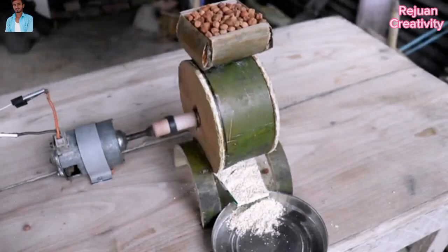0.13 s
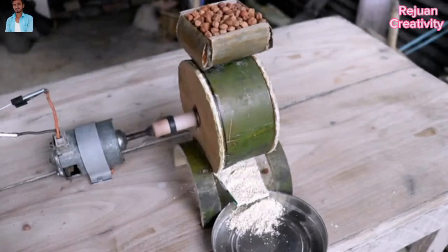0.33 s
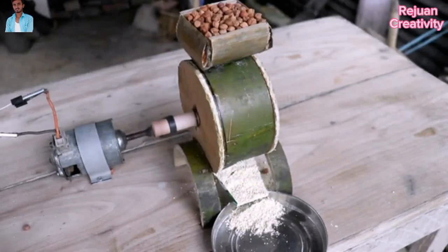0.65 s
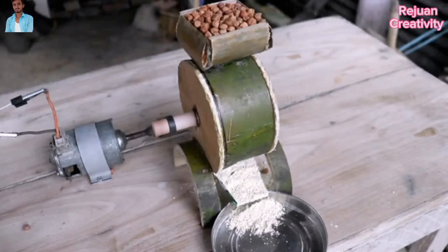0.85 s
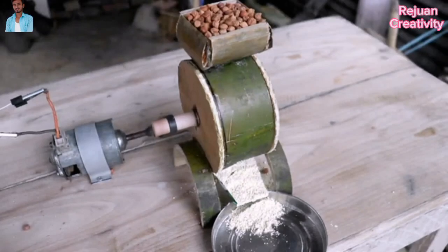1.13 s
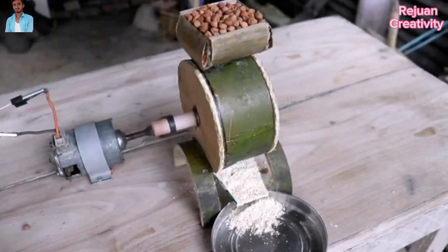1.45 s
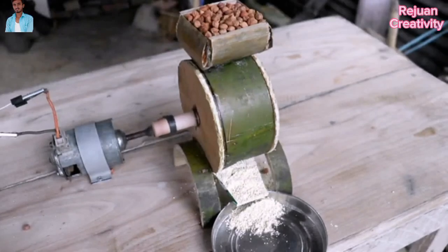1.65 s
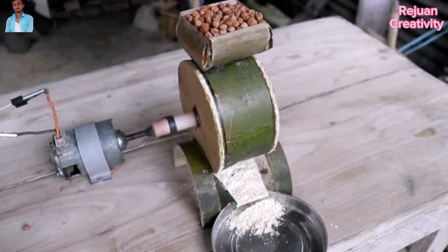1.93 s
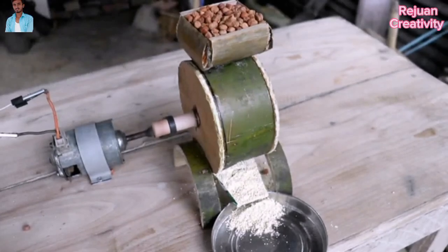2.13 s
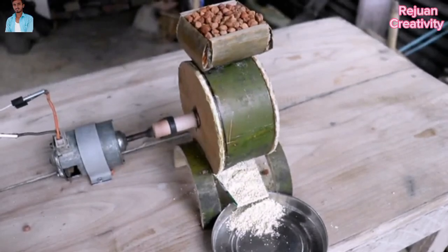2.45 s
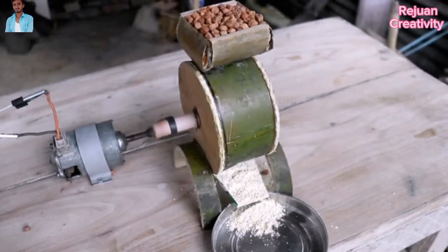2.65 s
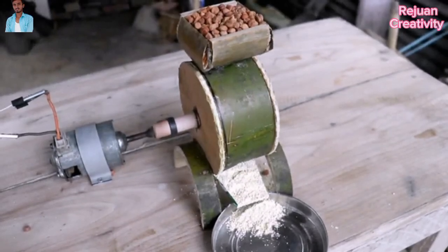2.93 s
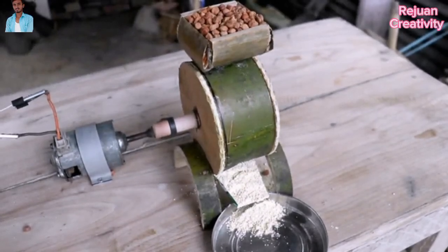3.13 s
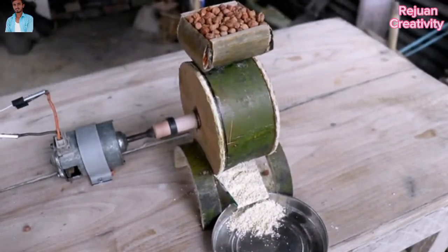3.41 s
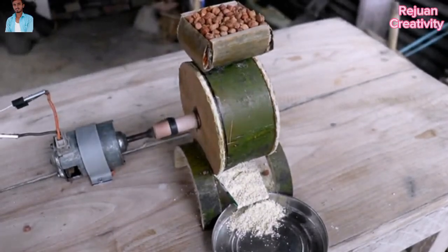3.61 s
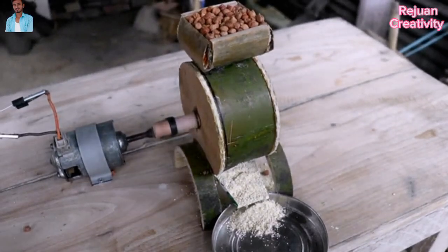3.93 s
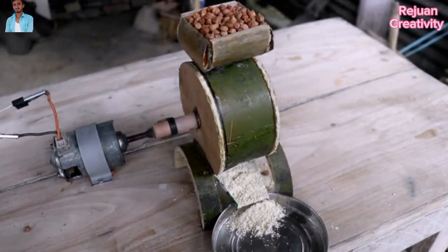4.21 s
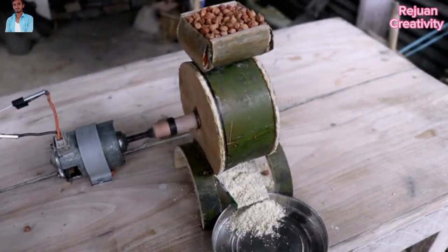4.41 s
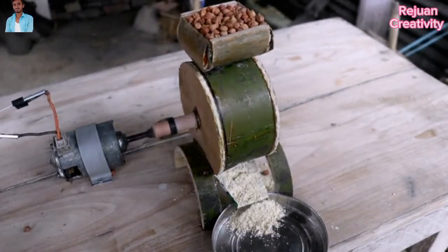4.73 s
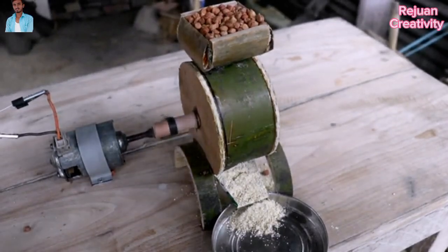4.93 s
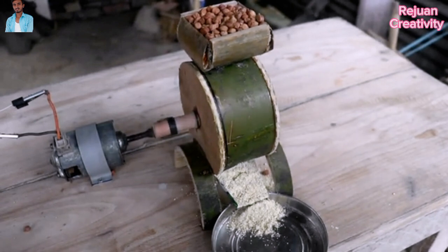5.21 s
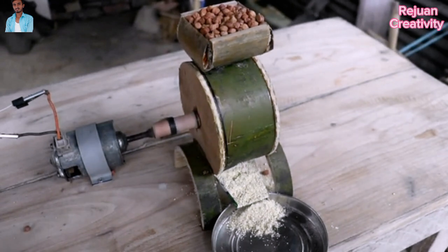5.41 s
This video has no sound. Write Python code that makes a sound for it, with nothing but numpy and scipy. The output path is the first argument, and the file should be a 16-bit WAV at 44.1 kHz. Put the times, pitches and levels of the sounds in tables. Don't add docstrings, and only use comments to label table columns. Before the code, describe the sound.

A small homemade motor-driven mill cracks and rattles hard kernels in a drum, with sharp snaps, hollow knocks, dusty hiss and low shaking.

```python
import sys
import numpy as np
from scipy import signal
from scipy.fft import rfft, irfft, next_fast_len
from scipy.io import wavfile

SR = 44100
rng = np.random.default_rng(int(sys.argv[2]) if len(sys.argv) > 2 else 0)


def invert_db(level):
    return 10 ** (np.asarray(level, dtype=float) / 20)


def output_pcm(signal):
    pcm = np.clip(np.atleast_2d(signal).T, -1, 1) * 32767
    wavfile.write(sys.argv[1], SR, np.round(pcm).astype(np.int16))


N = 245195

# mode_hz, level_db, t60_s
WALL_MODES = [(740, -19, 0.0028), (930, -10, 0.033), (1216, 0, 0.019), (1454, -5, 0.018),
              (1812, -6.5, 0.038), (1948, -1.5, 0.029), (2086, -5.5, 0.036), (2543, -1.5, 0.025),
              (2743, -8, 0.041), (3187, -12.5, 0.054), (3630, -19, 0.0074), (4200, -31, 0.033)]
# freq_hz, density_db_per_hz
SPLINTER_SPECTRUM = [(900, -14.5), (1800, -10), (2700, 7), (4300, -3), (5800, -15.5), (9000, -25)]


def rms_one(x):
    return x / np.sqrt(np.mean(x ** 2, axis=-1, keepdims=True) + 1e-20)


def in_time(rows):
    time_s, *columns = np.transpose(rows)
    return [np.interp(np.arange(N) / SR, time_s, column) for column in columns]


def shape_gain(size, points):
    bin_hz = np.maximum(np.arange(size // 2 + 1) * SR / size, 1)
    freq_hz, level_db = np.array(points).T
    return invert_db(np.interp(np.log(bin_hz), np.log(freq_hz), level_db))


def colour(x, points):
    size = next_fast_len(N)
    return irfft(rfft(x, size) * shape_gain(size, points), size)[..., :N]


def drift(rate_hz):
    r = np.exp(-2 * np.pi * rate_hz / SR)
    settle = 9000
    noise = rng.standard_normal(N + settle)
    return rms_one(signal.lfilter([1], [1, -2 * r, r * r], noise)[settle:])


def ring(clicks, mode_hz, t60_s):
    r = invert_db(-60 / (t60_s * SR))
    w = 2 * np.pi * mode_hz / SR
    return signal.lfilter([0, np.sin(w)], [1, -2 * r * np.cos(w), r * r], clicks + 1e-18)


def resonance(x, mode_hz, width_hz):
    t60_s = np.log(1000) / np.pi / width_hz
    return rms_one(ring(ring(x, mode_hz, t60_s), mode_hz, t60_s / 3))


def grains(per_s, spread_db):
    hits = rng.random(N) < per_s / SR
    sizes = invert_db(spread_db * np.minimum(rng.exponential(1, N), 4)) * hits
    return sizes * rng.choice([-1, 1], (2, N))


def placed(times_s, level_db, bursts):
    out = np.zeros((2, N + SR))
    for time_s, db, burst in zip(times_s, level_db, bursts):
        start = int(time_s * SR)
        peak = np.abs(burst).max(1, keepdims=True)
        out[:, start:start + burst.shape[1]] += invert_db(db) * burst / peak
    return out[:, :N]


def strikes(times_s, level_db, modes, rise_s, detune, scatter_db):
    t = np.arange(2200) / SR
    mode_hz, mode_db, t60_s = np.transpose(modes)[:, None, :, None, None]
    luck = rng.standard_normal((len(times_s), len(modes), 2, 3))
    pitch_hz = mode_hz * np.exp(detune * luck[:, :, :1, :1])
    gain = invert_db(mode_db + scatter_db * luck[..., 1:2] - 60 * t / t60_s)
    rings = gain * np.sin(2 * np.pi * (pitch_hz * t + luck[..., 2:]))
    return placed(times_s, level_db, rings.sum(1) * (1 - np.exp(-t / rise_s)))


def splinters(times_s, level_db, spectrum, length_s):
    stretch = np.exp(0.36 * rng.standard_normal((len(times_s), 1, 1)))
    t = np.arange(600) / SR / length_s[:, None, None] / stretch
    swarm = rng.standard_normal((len(times_s), 2, 600)) * t * np.exp(-t)
    return placed(times_s, level_db, irfft(rfft(swarm, 1024) * shape_gain(1024, spectrum)))


def frame(shake_db):
    modes_hz = [62, 110, 154, 203, 360, 442, 586]
    # width_hz, level_db
    mode_shapes = [(18.2, -11), (50, -6.5), (14.5, -1.5), (20, 2), (45.6, 2.5), (21.7, 0), (43.3, -8.5)]
    blows = grains(300.0 * invert_db(2.2 * drift(30.0)), 2.85)
    shaking = 0
    for mode_hz, (width_hz, level_db) in zip(modes_hz, mode_shapes):
        shaking = shaking + invert_db(level_db) * resonance(blows, mode_hz, width_hz)
    return invert_db(shake_db + 5.5) * rms_one(shaking)


def grit_in_air(times_s, level_db):
    settle_s = 0.05
    thrown = np.zeros(N)
    thrown[(times_s * SR).astype(int)] = invert_db(level_db)
    r = np.exp(-1 / (settle_s * SR))
    grit = signal.lfilter([1], [1, -2 * r, r * r], thrown)
    return grit / grit.mean()


def dust(hiss_db):
    # freq_hz, density_db_per_hz
    hiss_spectrum = [(1470, 12), (2500, -3.5), (3200, -2.5), (4260, -6.5), (6680, -19.5), (7530, -17),
                     (8740, -16.5), (12500, -24.5), (14300, -22), (14900, -18), (15400, -50)]
    grit = np.abs(grains(180.0 * invert_db(5.0 * drift(22.0)), 3.3)[0])
    puffs = 1 + 0.74 * signal.lfilter([1], [1, -.97], grit)
    edges_hz = np.geomspace(2000, 16000, 8)
    white = rng.standard_normal((2, 2, N))
    bands = 0
    for k, edge_hz in enumerate(zip(edges_hz, edges_hz[1:])):
        band = signal.sosfilt(signal.butter(2, edge_hz, "band", fs=SR, output="sos"), white[k % 2])
        bands = bands + band * invert_db(2.5 * drift(25.0) + 1.2 * drift(6.0))
    shaped = colour(bands * puffs * invert_db(1.2 * drift(25.0)), hiss_spectrum)
    top = signal.sosfilt(signal.butter(2, [5000, 14000], "band", fs=SR, output="sos"), shaped[0])
    return invert_db(hiss_db) * shaped / np.std(top)


def swells():
    # middle_s, rms_db, spread_s
    boom = [(0.373, -20.5, 0.086), (0.853, -17, 0.0095), (0.916, -15, 0.092), (1.083, -15.5, 0.032),
            (1.24, -21, 0.12), (1.382, -21.8, 0.018), (1.648, -15, 0.06), (1.805, -11.5, 0.022),
            (1.879, -8.8, 0.021), (2.009, -14.5, 0.022), (2.146, -19, 0.043), (2.332, -15, 0.049),
            (2.608, -17, 0.1), (2.798, -15, 0.0061), (2.95, -13, 0.11), (3.157, -14, 0.02),
            (3.349, -15.5, 0.037), (3.474, -22.5, 0.055), (3.638, -17, 0.021), (3.713, -14.5, 0.078),
            (3.903, -14, 0.025), (4.017, -16, 0.017), (4.167, -9, 0.012), (4.183, -17.0, 0.09),
            (4.34, -20, 0.016), (4.48, -12, 0.0052), (4.569, -18.5, 0.13), (4.82, -23.5, 0.11),
            (5.16, -25, 0.12), (5.429, -17.5, 0.048)]
    rest_db = -25.5
    t = np.arange(0, N, 64) / SR
    middle_s, rms_db, spread_s = np.transpose(boom)[:, :, None]
    bells = invert_db(rms_db) * np.exp(-((t - middle_s) / spread_s) ** 2 / 2)
    return np.interp(np.arange(N) / SR, t, 20 * np.log10(invert_db(rest_db) + bells.sum(0)))


def cavity(boom_db):
    cavity_hz = 301
    boom = resonance(grains(500.0, 3.4), cavity_hz, width_hz=31.8)
    swell = np.abs(signal.hilbert(boom, next_fast_len(N))[:, :N]) + 0.12
    return invert_db(boom_db) * resonance(boom / swell ** 0.75, cavity_hz, width_hz=40.0)


def tumble(tumble_db):
    blows = grains(1600.0 * invert_db(4.5 * drift(60.0) + 1.5 * drift(20.0)), 2.97)
    wakes = rng.random((len(WALL_MODES), N)) < .35
    rings = 0
    for (mode_hz, level_db, t60_s), woken in zip(WALL_MODES, wakes):
        rings = rings + invert_db(level_db) * ring(blows * woken, mode_hz, t60_s)
    ticks = signal.sosfilt(signal.butter(2, [1100, 4200], "band", fs=SR, output="sos"), blows)
    return invert_db(tumble_db + 1.2) * rms_one(rms_one(rings) + 0.42 * rms_one(ticks))


def knocks(crack_s, crack_db):
    # start_s, peak_db
    wall_knocks = [(0.3343, -3.5), (0.3665, -7.5), (0.8577, -6), (0.9206, -3), (0.9686, -5), (0.9862, -4),
                   (1.1551, -7), (1.6676, -8), (1.7043, -3.5), (1.737, -4.5), (1.7936, -4), (1.8507, -8.5),
                   (2.6976, -6), (2.7439, -1.5), (2.815, -5), (2.8771, -5.5), (3.0118, -2), (3.1425, -6),
                   (3.3333, -3.5), (3.5637, -5.5), (3.8824, -4), (4.3157, -3.5), (4.3414, -2),
                   (4.4098, -3.5), (4.436, -3), (4.5628, -4.5), (4.6807, -6), (5.1087, -5.5),
                   (5.1552, -4.5), (5.4074, -4.5)]
    # start_s, peak_db
    thuds = [(0.247, -14), (0.376, -13.5), (0.947, -8.5), (1.02, -13), (1.178, -10.5), (1.656, -19),
             (1.977, -17), (2.381, -27), (2.51, -7.5), (2.589, -7.5), (2.829, -8.5), (3.136, -14),
             (3.36, -7), (3.855, -15), (3.955, -35), (3.99, -16), (4.258, -18), (4.29, -16), (4.51, -11),
             (4.557, -22), (4.673, -7.5), (4.794, -15), (5.26, -16), (5.513, -6.5)]
    # mode_hz, level_db, t60_s
    plate_modes = [(423.4, 12, 0.059), (530, -7.5, 0.047), (605, -7, 0.086), (696, -10, 0.03)]
    knock_gain_db, chip_db, crack_jolt_db = 4.5, -8.5, -8.5
    knock_s, knock_db = np.transpose(wall_knocks)
    knock_db = knock_db + knock_gain_db
    thud_s, thud_db = np.transpose(thuds)
    chips = splinters(knock_s, knock_db + chip_db, SPLINTER_SPECTRUM, length_s=0.0012 * invert_db(0.33 * knock_db))
    jolt_s = np.r_[knock_s, crack_s]
    jolt_db = np.r_[knock_db, crack_db + crack_jolt_db]
    wall = strikes(jolt_s, jolt_db - 4.5, WALL_MODES[:8], rise_s=0.0014, detune=0.041, scatter_db=3.5)
    plates = strikes(thud_s, thud_db, plate_modes, rise_s=0.0011, detune=0.038, scatter_db=5.5)
    return wall + chips + plates


def blows_on_blade():
    # start_s, peak_db, top_re_peak_db
    single_breaks = [(0.1704, -1.5, -14), (0.1993, -1.5, -16), (0.2154, 0, -14), (0.3486, -5, -12),
                     (0.4341, -1.5, -11), (0.9999, -2, -8.5), (1.1159, -6.5, -7.5), (1.2415, -1, -15),
                     (1.3382, -2.5, -15.5), (1.41, 2.5, -17), (1.5733, -6.5, -22), (1.8954, -1, -20),
                     (2.0004, 2, -14.5), (2.3458, -2.5, -17), (2.5077, -6, -16), (2.6048, -5, -14.5),
                     (2.829, -6, -19), (3.2122, -6.5, -12), (3.4421, -4.5, -13), (3.6902, -8.5, -14),
                     (3.927, -2.5, -15), (3.9738, -5.5, -13), (4.0163, -5, -14), (4.1813, -9, -8.5),
                     (4.9163, -2, -11), (5.036, -3, -11), (5.1641, 3, -13.5), (5.2401, -2, -11),
                     (5.4378, -7, -9.5), (5.5252, 3, -13),
                     (0.2049, -3, -17), (0.2957, -7.5, -31), (0.599, -13, -6), (0.788, -9.5, -18),
              (0.8889, -6, -17), (1.0433, -9.5, -12), (1.0978, -13, -8), (1.2054, -5, -22),
              (2.2862, -9, -15.5), (2.382, -9.5, -8), (2.4066, -4, -13), (2.5328, -10.5, -15),
              (2.889, -4.5, -19), (3.1882, -5, -23), (3.237, -9, -9.5), (3.5217, -10, -12),
              (3.5381, -9.5, -17), (3.6254, -8, -15), (3.7384, -5, -26), (4.0438, -12.5, -11),
              (4.0986, -7, -20), (4.2937, -5.5, -32), (4.7376, -4.5, -25), (4.793, -8, -8.5),
              (4.9857, -8.5, -25), (5.019, -6, -18), (5.1253, -6, -21), (5.2794, -12, -8.5),
              (5.323, -4.5, -14), (5.5134, -3.5, -17)]
    # first_s, last_s, blow_count, peak_db, top_re_peak_db
    runs = [(0.376, 0.394, 3, -3.5, -7.5), (0.49, 0.504, 2, -5.5, -12), (0.526, .565, 3, 0, -12.5),
            (.639, .659, 2, -4.5, -8.5), (.684, 0.699, 2, -2, -12), (1.43, 1.451, 2, -0.5, -11),
            (1.472, 1.531, 4, -5, -12.5), (2.043, 2.064, 2, -3, -14), (2.094, 2.131, 3, -4, -16.5),
            (2.188, 2.213, 3, -6, -13.5), (3.383, 3.42, 4, 0, -15.5), (4.817, 4.869, 4, -2, -12),
            (5.338, 5.381, 4, -4.5, -24.5)]
    crack_gain_db, top_gain_db, run_scatter_db = 5.0, -0.5, 1.5
    single = np.array(single_breaks) + [0, crack_gain_db, top_gain_db]
    repeated = []
    for first_s, last_s, count, peak_db, top_db in runs:
        for start_s in np.linspace(first_s, last_s, round(count)):
            repeated.append((start_s, peak_db, top_db))
    repeated = np.array(repeated)
    repeated[:, 1:] += run_scatter_db * rng.standard_normal((len(repeated), 2))
    return np.r_[single, repeated].T


def cracks(start_s, db, top_db):
    # freq_hz, density_db_per_hz
    top_spectrum = [(4500, 2.5), (6200, -9.5), (7700, 7), (9000, -1), (12000, -11.5), (15000, -6)]
    # mode_hz, level_db, t60_s
    blade_modes = [(2040, -4, 0.0062), (2593, 0, 0.028), (3136, -1.5, 0.054), (3840, 1, 0.012),
                   (4377, 2, 0.026), (5380, -2.5, 0.014)]
    # mode_hz, level_db, t60_s
    blade_top_modes = [(6070, 11.5, 0.0071), (7550, 3.5, 0.022), (9500, -2.5, 0.0093), (10980, 0, 0.017),
                       (12500, -10, 0.0013)]
    body = splinters(start_s, db - 2.5, SPLINTER_SPECTRUM, length_s=0.0012 * invert_db(0.28 * db))
    crumble = splinters(start_s, db - 13.0, SPLINTER_SPECTRUM, length_s=0.0025 * invert_db(0.3 * db))
    top = splinters(start_s, db + top_db + 6.0, top_spectrum, length_s=0.00059 * invert_db(0.21 * db))
    blade = strikes(start_s, db - 9.5, blade_modes, rise_s=0.0014, detune=0.0655, scatter_db=1.5)
    blade_top = strikes(start_s, db + top_db - 3.0, blade_top_modes, rise_s=0.0012, detune=0.04, scatter_db=4.0)
    return body + crumble + top + blade + blade_top


def ports(mid, loose):
    # freq_hz, level_db
    width = [(60, -53), (110, -12), (200, -77), (380, -13), (700, -11.5), (1290, -5), (2380, -8),
             (4400, -4), (8120, 0), (15000, -0.5)]
    # freq_hz, level_db
    lean = [(60, 1), (180, 0.5), (550, 1.5), (1650, 0), (4970, -2.5), (15000, 3.5)]
    turned = signal.hilbert(mid, next_fast_len(N)).imag[:N]
    side = colour(-.45 * turned + 1.01 * loose, width)
    freq_hz, lean_db = np.transpose(lean)
    left = colour(mid + side, np.c_[freq_hz, lean_db / 2])
    right = colour(mid - side, np.c_[freq_hz, -lean_db / 2])
    return np.array([left, right])


def scene():
    # time_s, level_db
    load = [(.42, -22.5), (.47, -33.5), (.76, -31.5), (.87, -18.5), (1.38, -24), (1.46, -31.5), (1.86, -19),
            (1.93, -27.5), (2.6, -26.5), (2.84, -17), (3.25, -25.5), (3.37, -15.5), (3.48, -39),
            (3.58, -19), (4.22, -24.5), (4.32, -19), (4.66, -15.5), (4.95, -25)]
    load_db = in_time(load)[0]
    boom_db = swells()
    start_s, peak_db, top_db = blows_on_blade()
    load_swing_db = load_db - load_db.mean()
    boom_swing_db = boom_db - boom_db.mean()
    shake_db = -30.0 + 0.68 * boom_swing_db + 0.49 * load_swing_db
    grit = grit_in_air(start_s, peak_db + top_db)
    dust_db = -39.0 + 6.0 * np.tanh(grit) + .05 * load_swing_db
    dip_hz, dip_width_hz = 240, 52
    dip = signal.iirnotch(dip_hz, dip_hz / dip_width_hz, SR)
    lows = signal.lfilter(*dip, frame(shake_db) + cavity(boom_db))
    grinding = dust(dust_db) + tumble(load_db)
    mid, loose = lows + grinding + knocks(start_s, peak_db) + cracks(start_s, peak_db, top_db)
    return ports(mid, loose)


def top_cut(x):
    return signal.sosfilt(signal.butter(12, 16290, fs=SR, output="sos"), x)


def record(dry):
    # time_s, level_db
    fade_in = [
        (.150, -69),
        (.157, -24),
        (.175, -4.5),
        (.2, -1),
    ]
    release_db_per_s, attack_s = 228.0, 0.003
    low_cut_hz, top_cut_hz, start_s = 70.4, 16200, 0.144
    over_db = np.maximum(20 * np.log10(np.abs(dry).max(0) + 1e-9) + 0.62, 0)
    slope_db = np.arange(N) / SR * release_db_per_s
    duck_db = np.maximum.accumulate(over_db + slope_db) - slope_db
    r = np.exp(-1 / (attack_s * SR))
    x = dry * invert_db(-.9 * signal.lfilter([1 - r], [1, -r], duck_db) + 0.6)
    x = signal.sosfilt(signal.butter(3, low_cut_hz, "high", fs=SR, output="sos"), x)
    x = np.clip(x, -.93, .93)
    x = signal.sosfilt(signal.cheby2(12, 60, top_cut_hz, fs=SR, output="sos"), x)
    x = x * invert_db(in_time(fade_in)[0]) * (np.arange(N) > start_s * SR)
    return top_cut(x)


dry = scene()
out = record(dry)
output_pcm(out)
```